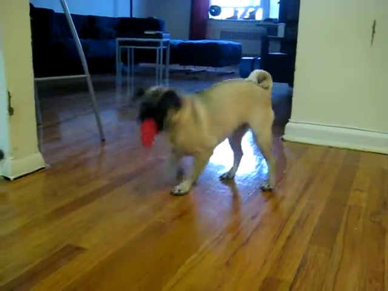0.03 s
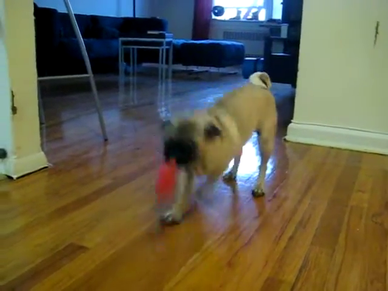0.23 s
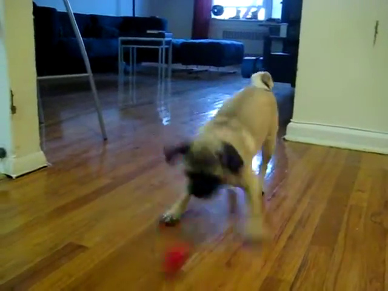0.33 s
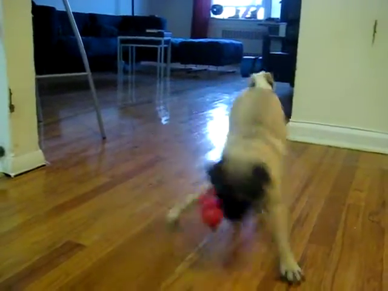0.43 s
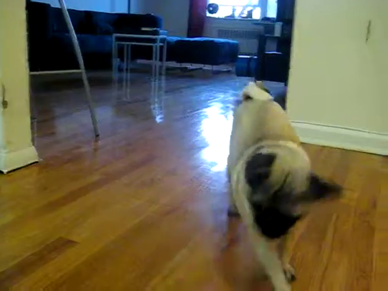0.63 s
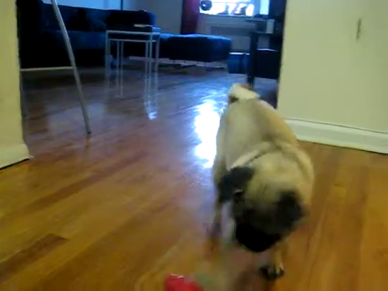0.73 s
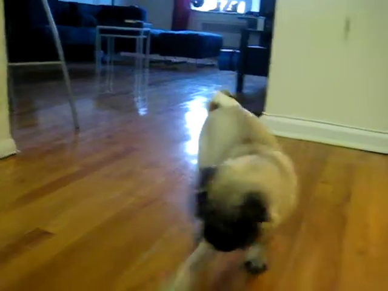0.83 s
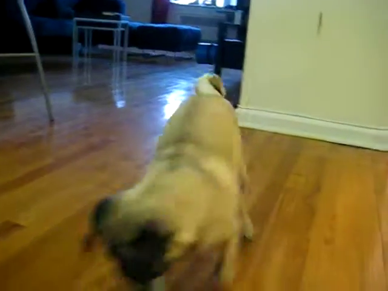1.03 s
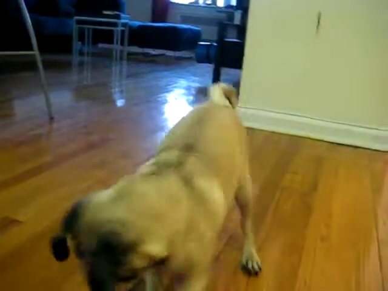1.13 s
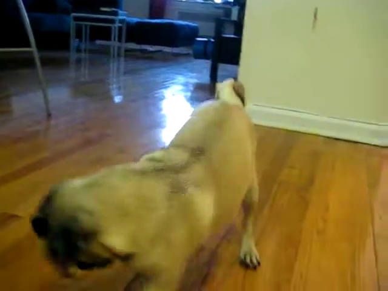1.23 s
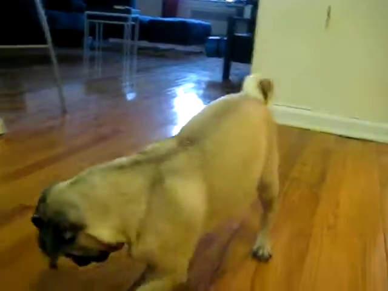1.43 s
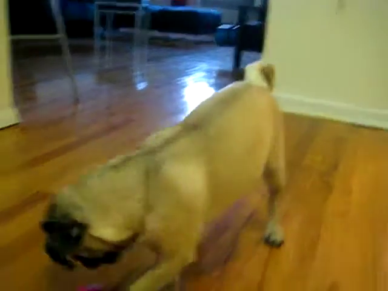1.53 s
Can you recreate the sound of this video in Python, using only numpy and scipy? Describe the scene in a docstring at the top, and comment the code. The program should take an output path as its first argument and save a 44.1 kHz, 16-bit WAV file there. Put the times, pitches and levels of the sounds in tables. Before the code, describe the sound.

A hollow rubber toy drops and bounces several times on a wooden floor while a small dog chases it on clicking, skidding claws. The rubber then squeaks briefly. A small microphone some way off catches room echo and faint hiss.

```python
"""A hollow rubber toy, dropped by a small dog, bounces across the wooden floor of a live room.
Each bounce is a low thump, a ring of the shell and a knock of the boards; the rubber chirps where
it grips. The dog gives chase on clicking, skidding claws and soft pads. A small microphone, thin
in the deep bass, stands far enough off to take in the room's echoes, over a faint hiss."""
import sys
import numpy as np
from scipy import signal
from scipy.fft import rfft, irfft, next_fast_len
from scipy.io import wavfile
from scipy.ndimage import map_coordinates

SR = 44100
rng = np.random.default_rng(int(sys.argv[2]) if len(sys.argv) > 2 else 0)


def file_out(sig):
    """Save sig as 16-bit WAV at sys.argv[1]."""
    # one column per channel
    cols = np.atleast_2d(sig).T
    # limit, then scale
    lim = np.clip(cols, -1, 1)
    pcm = np.round(lim * 32767).astype(np.int16)
    wavfile.write(sys.argv[1], SR, pcm)


N = 70560


def amp(db):
    """Decibels to gain."""
    return 10 ** (np.asarray(db) / 20)


def unit(x):
    """Scale to rms 1."""
    return x / np.sqrt(np.mean(x ** 2) + 1e-20)


def along(points, hz):
    """Read (frequency [Hz], value) points on a log axis."""
    freqs, values = np.transpose(points)
    return np.interp(np.log(hz + 1), np.log(freqs + 1), values)


def seconds():
    """Time of every sample."""
    return np.arange(N) / SR


def add(track, at, sound):
    """Mix a sound into the track from a time in seconds."""
    start = max(round(at * SR), 0)
    track[start:] += sound[:N - start]


def filtered(x, response):
    """Apply a gain that depends on frequency."""
    size = next_fast_len(N + SR // 2)
    return irfft(rfft(x, size) * response(np.fft.rfftfreq(size, 1 / SR)), size)[:N]


def noise(colour):
    """Coloured noise of rms 1."""
    return unit(filtered(rng.standard_normal(N), lambda hz: amp(along(colour, hz))))


def band(x, low_hz, high_hz, order):
    """Causal band-pass."""
    high = min(high_hz, SR * .47)
    low = min(low_hz, high * .9)
    return signal.sosfilt(signal.butter(order, [low, high], "band", fs=SR, output="sos"), x)


def wobble(knots_per_s):
    """A smooth random curve."""
    knots = rng.standard_normal(int(2 * knots_per_s) + 4)
    return map_coordinates(knots, [seconds() * knots_per_s])


def decay(t60):
    """An envelope that falls 60 dB in t60 seconds."""
    return np.exp(-np.minimum(np.log(1000) * seconds() / t60, 60))


def ring(hz, t60):
    """One dying mode."""
    return np.sin(2 * np.pi * hz * seconds()) * decay(t60)


def struck(modes, spread=0.018):
    """Modes of alternating polarity, their pitch and level a little different at every blow."""
    out = np.zeros(N)
    for k, (hz, db, t60) in enumerate(modes):
        gain = -(-1) ** k * amp(db + rng.normal(0, 1))
        out += gain * ring(hz * (1 + rng.normal(0, spread)), t60)
    return out


def burst(low_hz, high_hz, t60):
    """A dying puff of noise from near level 1, sloping gently below its band and steeply above."""
    fade = decay(t60)
    puff = band(rng.standard_normal(N) * fade, low_hz, high_hz * 1.28, order=1)
    puff = band(puff, low_hz / 2, high_hz, order=3)
    return puff * np.linalg.norm(fade) / np.linalg.norm(puff)


def swell(peak_s, rise, fall):
    """A rounded rise to a peak and a longer-tailed fall."""
    t = seconds() - peak_s
    rising = np.exp(-.5 * (t / rise) ** 2)
    falling = np.exp(1 - np.hypot(1, np.sqrt(2) * t / fall))
    return np.where(t < 0, rising, falling)


def hiss():
    """A faint, steady hiss with some rumble lies under everything."""
    # spectrum of the hiss (frequency [Hz], relative density [dB])
    colour = [(25, 16), (60, 4), (120, -2), (250, 2.5), (650, -1.5), (1250, 1), (2200, -5.5), (3700, -4.5),
              (5600, -7.5), (9800, -12.5), (16000, -24.5)]
    return amp(-40.5) * noise(colour)


def claw_clicks():
    """Each claw ticks, rings briefly on the wood and trails off in a scratch."""
    # claw strikes (time [s], level [dB], lower edge [Hz], upper edge [Hz])
    strikes = [(0.028, -30, 1550, 12000), (.0820, -23.5, 1040, 4000), (0.0881, -17.5, 1080, 3170),
               (0.0914, -18, 1160, 10800), (.2140, -36, 2500, 10000), (.2230, -11.5, 6100, 11000),
               (0.2384, -21, 4000, 10270), (.2480, -23.5, 5000, 10700), (0.2607, -15.5, 2520, 9700),
               (0.3223, -23, 4000, 10700), (0.4117, -18.5, 4900, 12000), (0.4275, -23.5, 3880, 10500),
               (.4370, -22, 2020, 6546), (0.4457, -22, 2970, 11500), (.5585, -29, 9000, 15000),
               (0.566, -20, 1780, 11100), (0.5707, -25, 3020, 12000), (0.5796, -11, 2950, 11200),
               (0.6002, -20.5, 5000, 11900), (0.6155, -29, 2500, 8000), (0.6625, -22.5, 4540, 11300),
               (0.7588, -13.5, 2870, 12400), (.9488, -20, 5000, 13000), (0.9826, -8, 2820, 12600),
               (.9876, -32, 5050, 9000), (1.078, -21, 2460, 9500), (1.2362, -10, 8800, 13400),
               (1.4442, -27.5, 5400, 11900), (1.5872, -23.5, 2500, 12000)]
    # modes of a claw on wood (frequency [Hz], relative level [dB], t60 [s])
    claw_modes = [(2750, -11, 0.011), (3440, -18.5, 0.011), (5000, -16.5, 0.021), (7520, -12.5, 0.0089)]
    out = np.zeros(N)
    for at, db, low_hz, high_hz in strikes:
        tick = burst(low_hz, high_hz, t60=0.0042)
        scratch = amp(-21.5) * burst(low_hz, high_hz, t60=0.048)
        add(out, at, amp(db) * (tick + struck(claw_modes, spread=0.063) + scratch))
    return out


def paw_falls():
    """The pads land softly, each a dull puff of noise."""
    # landings (time [s], level [dB], rough pitch [Hz], t60 [s])
    landings = [(0.1768, -34.5, 407, 0.18), (0.5651, -32, 356, 0.36), (0.57, -37.5, 170, 0.2),
                (1.5668, -30, 1020, 0.021)]
    out = np.zeros(N)
    for at, db, hz, t60 in landings:
        add(out, at, amp(db) * burst(hz / 2, hz * 1.71, t60))
    return out


def claw_skids():
    """Claws slide over the boards with a fine-grained scrape."""
    # skids (peak time [s], rise [s], fall [s], level [dB])
    skids = [(0.225, 0.0019, 0.035, -36), (0.577, 0.0075, 0.012, -28), (.610, 0.011, .014, -43.5),
             (.763, 0.02, 0.02, -27.5), (0.969, 0.0039, 0.0035, -34), (1.005, 0.0065, 0.04, -38)]
    # spectrum of the scrape (frequency [Hz], relative level [dB])
    colour = [(500, -15), (1800, 3), (3500, 1.5), (7500, 2), (10500, -4), (13000, -12.5), (16000, -23)]
    grain_db = 3.5
    grit = unit(noise(colour) * amp(grain_db * wobble(knots_per_s=1100)))
    return grit * sum(amp(db) * swell(at, rise, fall) for at, rise, fall, db in skids)


def bounce(thump_hz, thump_db, hollow_db, knock_db, bright_hz, slap_db):
    """The toy thumps at a pitch set by how it lands and knocks the boards; harder contact is brighter."""
    # modes of the floorboards (frequency [Hz], relative level [dB], t60 [s])
    board_modes = [(148.7, -14.5, 0.11), (224.5, -16.5, 0.0725), (611, -9.5, 0.016), (833, -8.5, 0.023),
                   (924, -15.5, 0.052), (1142, -8.5, 0.023), (1307, -7, 0.034), (1504, -4, 0.021),
                   (1800, -12, 0.016), (2064, -13.5, 0.03)]
    # modes of the hollow rubber shell (frequency [Hz], relative level [dB], t60 [s])
    shell_modes = [(252, -8, 0.065), (322.6, -1.5, 0.12), (402, -1.5, 0.059), (488, -0.5, 0.056)]
    attack_s = 0.0005
    thump = -ring(thump_hz, t60=0.12) * (1 - np.exp(-seconds() / attack_s))
    knock = signal.sosfilt(signal.butter(2, bright_hz, fs=SR, output="sos"), struck(board_modes))
    crack = amp(-15) * burst(low_hz=1200, high_hz=10300, t60=0.015)  # first contact
    slap = burst(low_hz=1670, high_hz=2810, t60=0.017)  # rubber on varnish
    body = amp(thump_db) * thump + amp(hollow_db) * struck(shell_modes)
    return body + amp(knock_db) * (knock + crack) + amp(slap_db) * slap


def toy():
    """Every bounce lands on a new spot, so the room answers each with a different tail."""
    # bounces (time [s], thump pitch [Hz], thump [dB], hollow ring [dB], knock [dB],
    # contact brightness [Hz], slap [dB])
    bounces = [(0.3181, 204.3, -14, -27, -10.5, 1525, -47), (0.394, 183, -33, -34, -17, 2490, -21.5),
               (0.6235, 399.4, -22.5, -17.5, -4, 2700, -24.5),
               (.8480, 148.5, -11.5, -21.5, -7.5, 1820, -20), (0.9741, 158.7, -22.5, -20, -8, 2020, -19),
               (1.0215, 173, -26.5, -44, -22, 3000, -15.5)]
    out = np.zeros(N)
    for at, *contact in bounces:
        direct = np.zeros(N)
        add(direct, at, bounce(*contact))
        out += direct + room(direct)
    return out


def rubber_chirps():
    """Rubber sticks and slips on the varnish in brief, unsteady, raspy tones."""
    # grips (peak time [s], rise [s], fall [s], pitch [Hz], level [dB], jitter [share of pitch],
    # rasp against the tone [dB])
    grips = [(0.3222, 0.0012, 0.0029, 3586, -12.5, 0.035, -11),
             (0.332, 0.0017, 0.0066, 3600, -25.5, 0.025, -15),
             (1.2757, 0.0013, 0.0042, 1710, -27.5, 0.054, -2),
             (1.2945, 0.0046, 0.012, 1624, -23, 0.057, -9),
             (1.3038, 0.0026, 0.0024, 1965, -15.5, 0.062, -9),
             (1.326, 0.0078, 0.0051, 2135, -28.5, .08, -5)]
    # spectrum of the rasp (frequency [Hz], relative level [dB])
    rasp_colour = [(300, -22), (780, 3), (1100, -13), (1700, -14), (2300, 6), (3000, 3), (4000, 4),
                   (6000, -6.5), (12000, -36)]
    out = np.zeros(N)
    for at, rise, fall, hz, db, jitter, rasp_db in grips:
        pitch = hz * (1 + jitter * wobble(knots_per_s=1100))
        phase = 2 * np.pi * np.cumsum(pitch) / SR
        tone = np.sin(phase) + amp(-24.5) * np.sin(2 * phase)
        out += amp(db) * swell(at, rise, fall) * (tone + amp(rasp_db) * noise(rasp_colour))
    return out


def room(x):
    """The room sends the microphone a diffuse tail, low standing waves and four dull wall echoes."""
    # reverberation time (frequency [Hz], t60 [s])
    tail_t60 = [(100, 0.86), (200, 0.33), (400, 0.96), (1400, 0.74), (4000, 0.59), (8000, 0.32),
                (14000, 0.47)]
    # colour of the tail (frequency [Hz], gain [dB])
    tail_colour = [(60, -10), (150, 3), (220, 2.5), (400, 0), (800, 1), (1400, 0), (2400, -6), (4000, -0.5),
                   (8000, -4.5), (14000, -11.5)]
    # standing waves (frequency [Hz], relative level [dB], t60 [s])
    standing_waves = [(128, -60, 1), (152, -30, .55), (206.8, -17, 0.31), (243, -45, 0.27),
                      (320, -24.5, 0.27), (382, -26, 0.43)]
    # wall echoes (delay [s], gain [dB])
    walls = [(.0052, -9.5), (0.039, -14.5), (.048, -14.5), (.083, -15.5)]
    build_s, standing_db = 0.014, -41.5
    hz, t, spectra = signal.stft(rng.standard_normal(N), SR, nperseg=256)
    t60 = along(tail_t60, hz)[:, None]
    equal_energy = np.sqrt(2 * np.log(1000) / (t60 * SR))
    fade = np.exp(-np.log(1000) * t / t60) * equal_energy
    tail = signal.istft(spectra * fade, SR, nperseg=256)[1][:N]
    tail = filtered(tail, lambda f: amp(along(tail_colour, f)))
    tail *= 1 - np.exp(-seconds() / build_s)
    tail += amp(standing_db) * sum(amp(db) * ring(f, life) for f, db, life in standing_waves)
    wet = signal.fftconvolve(x, tail)[:N]
    dull = band(x, low_hz=78.6, high_hz=2100, order=1)
    for delay, db in walls:
        add(wet, delay, amp(db) * dull)
    return wet


def scene():
    """Toy and dog from one spot in the room, in mono, over the hiss."""
    dog = claw_clicks() + paw_falls() + claw_skids()
    chirps = rubber_chirps()
    reverb = room(dog + amp(-3.5) * chirps)
    return (toy() + dog + chirps + reverb + hiss())[None]


def record(dry):
    """The small microphone loses the deep bass, and the recorder keeps nothing above its band limit."""
    low_cut_hz, top_hz = 120, 15800
    thin = signal.sosfilt(signal.butter(2, low_cut_hz, "high", fs=SR, output="sos"), dry)
    return np.array([filtered(channel, lambda hz: hz < top_hz) for channel in thin])


dry = scene()
out = record(dry)
file_out(out)
```